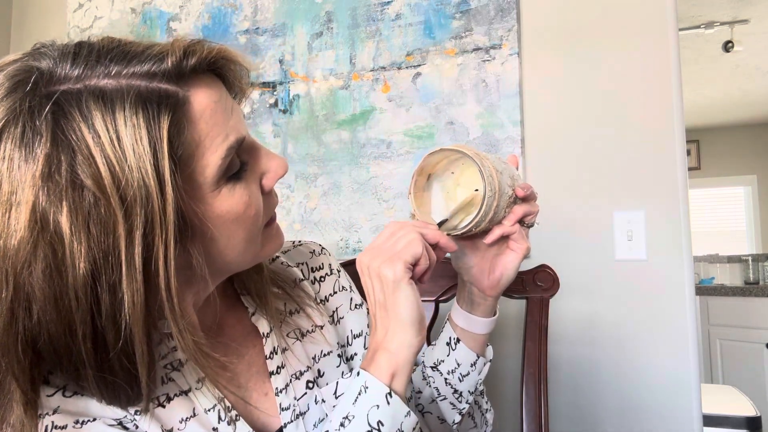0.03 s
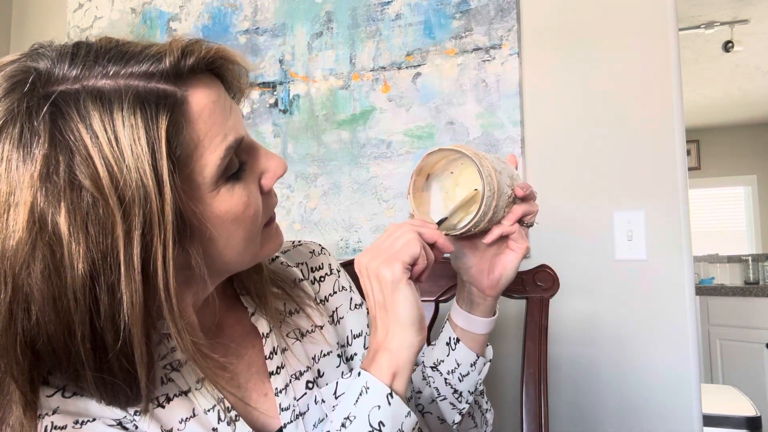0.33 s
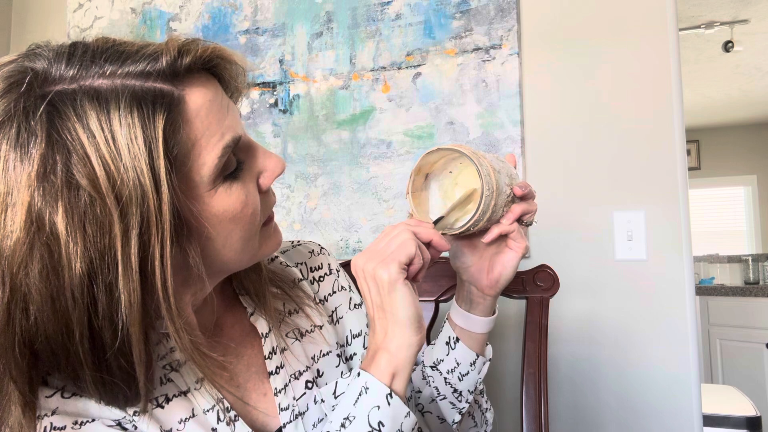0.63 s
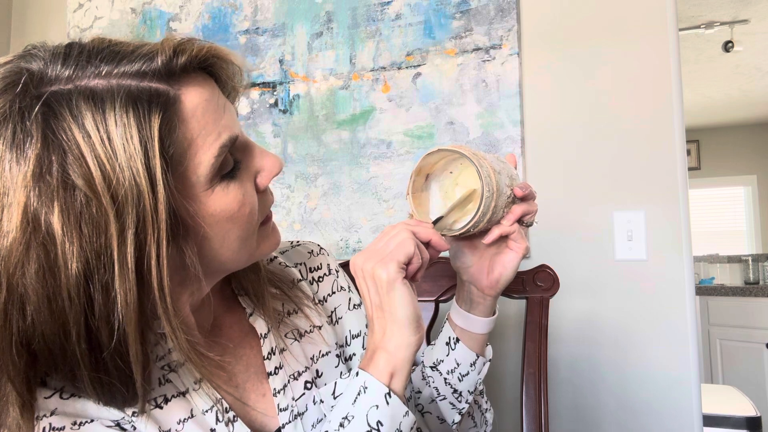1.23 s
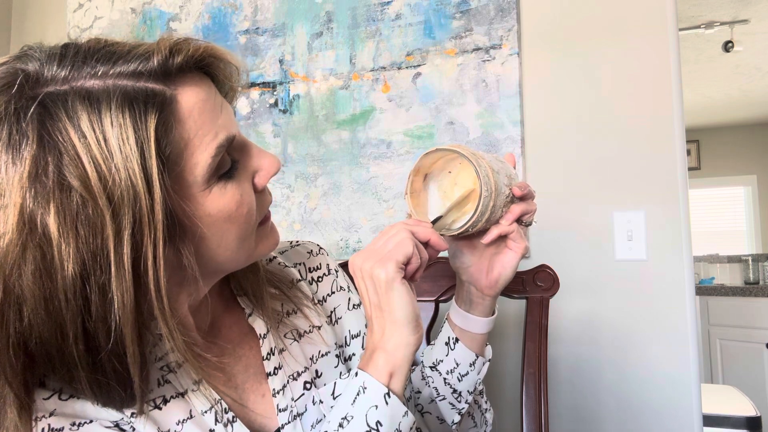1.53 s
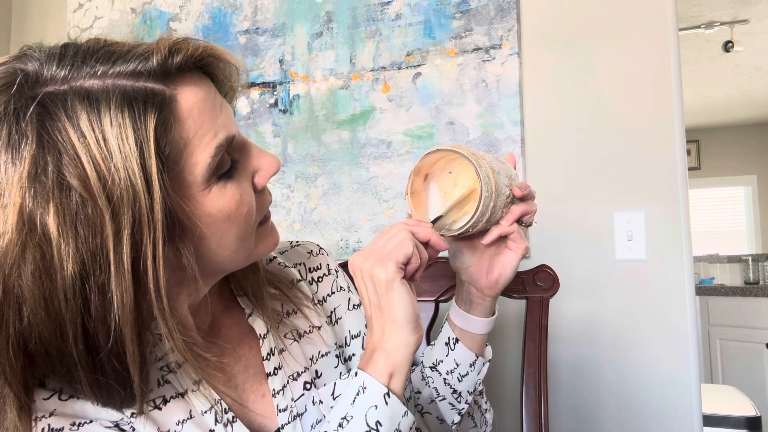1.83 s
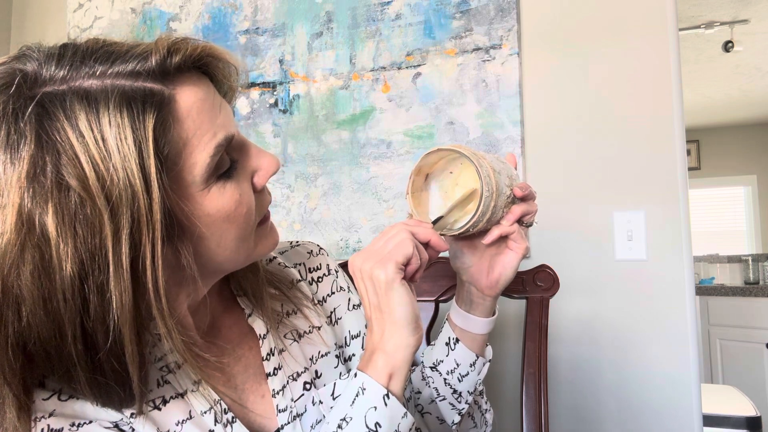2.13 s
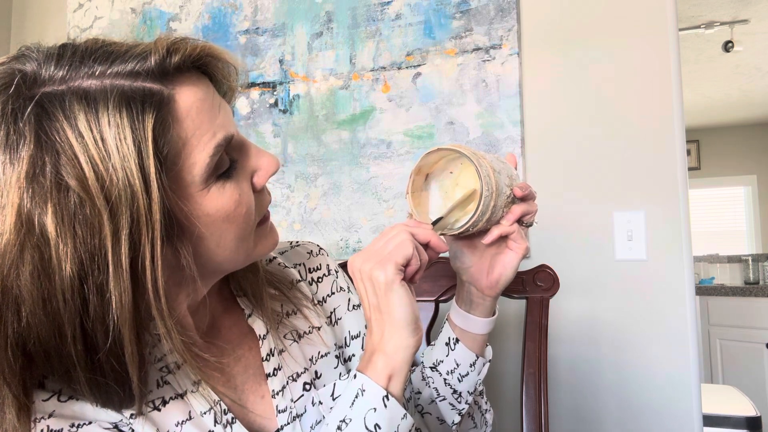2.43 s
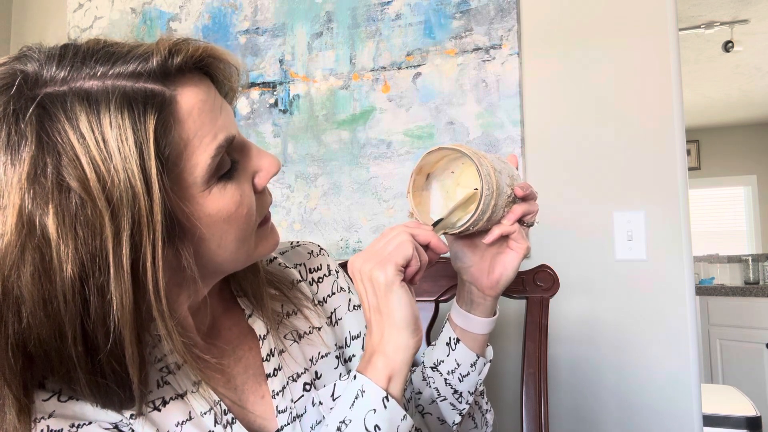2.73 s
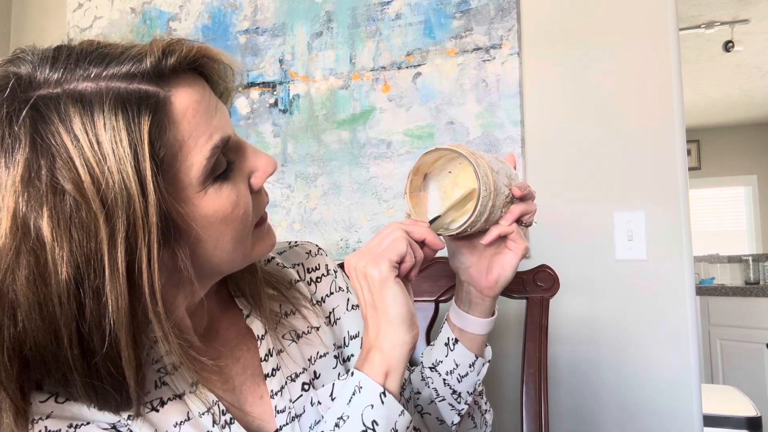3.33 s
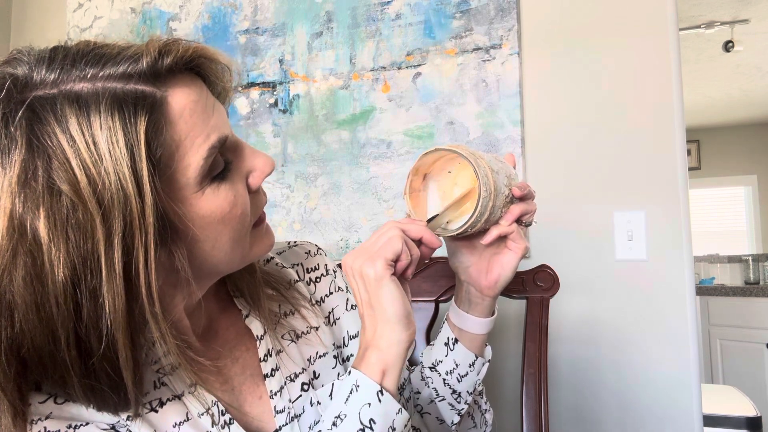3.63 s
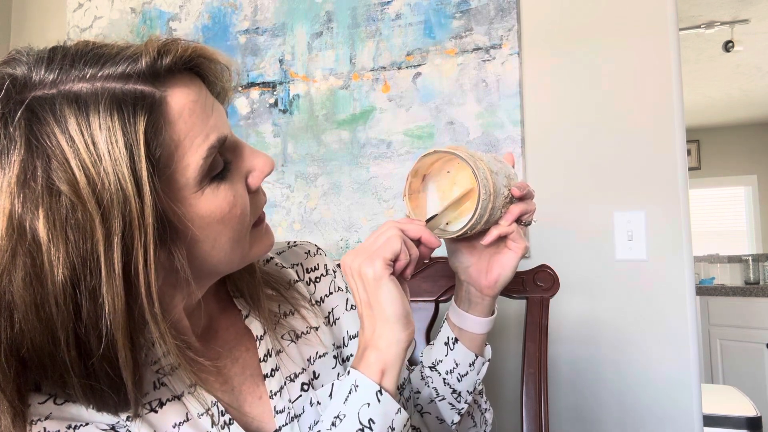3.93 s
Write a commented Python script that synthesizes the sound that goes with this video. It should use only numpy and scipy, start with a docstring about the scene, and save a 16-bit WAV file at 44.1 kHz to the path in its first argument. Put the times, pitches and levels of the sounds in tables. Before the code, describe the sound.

An electric lighter sizzles inside a small candle jar, starting with a quick double click at about 0.2 seconds. The high crackle dips near 0.5, from 1.3 to 1.9, around 3 and after 3.5 seconds. Sharp snaps stand out near 0.7, 1.2, 2.5 and 2.9 seconds. The wick gives tiny pops and flutters faintly around 2.7 seconds. Soft room hum and rumble lie underneath.

```python
"""In a quiet room, an electric arc lighter is held to the wick inside a small candle jar.
Its switch clicks twice, then the arc sizzles in uneven spells: dense tiny sparks and a few louder snaps
ring the hollow of the jar. The waxed wick fries, pops now and then and briefly burns with a flutter.
Mains hum, room noise and a soft rumble lie underneath."""
import sys
import numpy as np
from scipy import signal
from scipy.fft import rfft, irfft
from scipy.io import wavfile

SR = 44100
rng = np.random.default_rng(int(sys.argv[2]) if len(sys.argv) > 2 else 0)


def dump_mix(stems):
    """Bounce the given channels to the path in sys.argv[1] as a 16-bit WAV at rate SR."""
    frames = np.atleast_2d(stems).T  # one column per channel
    limited = np.clip(frames, -1, 1)  # hard clip at full scale
    pcm = np.round(limited * 32767).astype(np.int16)
    wavfile.write(sys.argv[1], SR, pcm)


N = 176400
T = np.arange(N) / SR
F = np.maximum(np.fft.rfftfreq(N, 1 / SR), 1)
SIDE = np.array([[1], [-1]])  # plus on the left, minus on the right

JAR_T60_S, ROOM_T60_S, ROOM_DULL_HZ = 0.062, 0.26, 7460
ROOM_PAN_DB, WICK_PAN_DB = 3.5, 5.5

# The switch's two clicks. Each row: start in seconds, tick level in dB, rise and contact time in
# seconds, top of the treble in Hz, hollow knock in dB, rubbing in dB.
SWITCH_CLICKS = [(0.155, -12.5, 0.00112, 0.0011, 11300, -32, -48),
                 (0.195, -14.5, 0.00016, 0.00022, 16000, -22.5, -71)]


def undb(db):
    """Decibels to gain."""
    return 10 ** (np.asarray(db) / 20)


def unit(x):
    """Scale to rms 1."""
    return x / np.sqrt(np.mean(x ** 2))


def fader(points, trim_db=0, outside_db=None):
    """A gain that rides through (seconds, dB) points."""
    return undb(np.interp(T, *np.array(points).T, left=outside_db, right=outside_db) + trim_db)


def pan_right(x, db):
    """Make the right channel db louder than the left."""
    return x * undb(-SIDE * db / 2)


def drift(hz):
    """Smooth random movement of rms 1, mostly slower than hz."""
    return unit(irfft(rfft(rng.standard_normal(N)) / (1 + (F / hz) ** 2), N))


def causal(gain):
    """Minimum-phase response with the given gain at each frequency."""
    cepstrum = irfft(np.log(gain), N)
    cepstrum[1:N // 2] *= 2
    cepstrum[N // 2 + 1:] = 0
    return np.exp(rfft(cepstrum))


def colour(points):
    """An EQ curve through (Hz, dB) points."""
    hz, db = np.array(points).T
    return causal(undb(np.interp(np.log(F), np.log(hz), db)))


def resonance(hz, width):
    """Response of one damped resonance."""
    return 1 / (1 + 1j * (F ** 2 - hz ** 2) / (F * width))


def through(x, response):
    """Filter by a response scaled to unit power."""
    return irfft(rfft(x) * response / np.sqrt(np.mean(abs(response) ** 2)), N)


def low_pass(x, hz, order):
    """Keep what lies below a frequency."""
    return irfft(rfft(x) / np.sqrt(1 + (F / hz) ** (2 * order)), N)


def band_level(x, low_hz, high_hz):
    """Rms of a sound between two frequencies."""
    return np.sqrt(np.mean(irfft(rfft(x) * (F > low_hz) * (F < high_hz), N) ** 2))


def burst(start, decay_s, rise_s=.0001):
    """A fast-dying crack of noise with unit energy."""
    age = np.maximum(T - start, 0)
    attack = 1 - np.exp(-(age / rise_s) ** 2)
    return unit(rng.standard_normal(N) * attack * np.exp(-age / decay_s)) / np.sqrt(N)


def echoes(x, t60):
    """Dense dying reflections, different left and right."""
    tail = rng.standard_normal((2, N)) * np.exp(-np.log(1000) * T / t60) * np.minimum(T / (t60 / 20), 1)
    return signal.fftconvolve(np.atleast_2d(x), unit(tail) / np.sqrt(N), axes=1)[:, :N]


def space(x, ring_db, room_db):
    """Add the jar's short ring and the room's duller echo."""
    ring = undb(ring_db) * echoes(x, JAR_T60_S)
    return x + ring + undb(room_db) * low_pass(echoes(x, ROOM_T60_S), ROOM_DULL_HZ, order=2)


def room_tone():
    """Soft room noise and slightly wavering hum, a little to the right."""
    # Colour of the room noise. Each row: frequency in Hz, relative level in dB.
    air_eq = [(25, -25.5), (55, -1), (90, 0.5), (140, -4), (220, -1.5), (300, -9.5), (500, -11.5),
              (750, -14.5), (1000, -29.5), (2000, -33), (4000, -27), (8000, -34.5), (15000, -42)]
    # Mains hum and appliance tones. Each row: pitch in Hz, relative level in dB.
    hum_tones = [(59.2, -64.5), (209.9, -70.5), (592.2, -78), (651.4, -77), (710.6, -73), (769.8, -80),
                 (829.0, -86)]
    mid, side = through(rng.standard_normal((2, N)), colour(air_eq))
    side = irfft(rfft(side) * F / (F + 70), N)  # the deep bass stays narrow
    air = undb(-68) * (mid + undb(3.5) * side * SIDE)
    hum = 0
    for hz, db in hum_tones:
        phase = 2 * np.pi * (hz * T + rng.random()) + 0.42 * drift(hz=3.8)
        hum = hum + np.sqrt(2) * undb(db - 2.5) * np.sin(phase)
    return pan_right(air + hum, ROOM_PAN_DB)


def rumble():
    """A low boom that swells and sinks unevenly."""
    # The boom's swells. Each row: time in seconds, relative level in dB.
    swells = [(0.0, -56.5), (0.03, -70), (0.14, -76), (0.19, -66), (0.71, -61.5), (0.79, -67),
              (1.14, -62.5), (1.21, -80), (1.26, -66), (1.43, -79), (1.49, -58.5), (1.56, -73), (1.74, -58),
              (1.77, -80), (1.89, -58.5), (2.54, -70.5), (2.63, -60.5), (2.78, -71), (2.96, -59),
              (3.01, -70), (3.2, -58), (3.22, -67), (3.84, -60.5), (4.0, -68)]
    mid, side = through(rng.standard_normal((2, N)), resonance(hz=210.8, width=112) ** 2)
    return pan_right(fader(swells, trim_db=-1.5) * (mid + .5 * side * SIDE), ROOM_PAN_DB)


def switch():
    """The switch catches, scrapes along, then snaps home and knocks the lighter's body."""
    # Colour of a tick. Each row: frequency in Hz, relative level in dB.
    tick_eq = [(300, -26), (1000, 0.5), (1800, -14), (3000, -4), (4700, -5), (7000, 4.5), (9500, 3.5),
               (12000, 11.5), (15500, 1.5)]
    # Modes of the knocked lighter and jar. Each row: pitch in Hz, width in Hz, relative level in dB.
    knock_modes = [(423, 230, 4), (700, 170, 4), (1000, 87, 14), (1210, 110, -6)]
    # Modes of the jar, rung by the scraping switch. Each row: pitch in Hz, width in Hz, relative level in dB.
    scrape_modes = [(1270, 130, -5.5), (2100, 220, -0.5), (3170, 140, 0), (3610, 140, -6), (5000, 830, 0.5),
                    (6550, 690, 0), (8200, 370, -11)]
    body, scrape = (sum(undb(db) * resonance(hz, width) for hz, width, db in modes)
                    for modes in (knock_modes, scrape_modes))
    rub_decay_s = 0.027
    clicks = 0
    for at, db, rise, contact, top_hz, knock_db, rub_db in SWITCH_CLICKS:
        rub = undb(rub_db) * rng.standard_normal(N) * (T > at) * np.exp(-abs(T - at) / rub_decay_s)
        tick = through(undb(db) * burst(at, contact, rise), colour(tick_eq))
        knock = undb(knock_db) * through(signal.unit_impulse(N, int((at + rise) * SR)), body)
        clicks = clicks + low_pass(tick + through(rub, scrape), top_hz, order=14) + knock
    return space(clicks, ring_db=-10, room_db=-5)


def sparks(per_second=8000, spread_db=2, sputter_db=1, flutter_db=1.5, flutter_hz=76.5):
    """Dense tiny discharges of random size that bunch into sputters and flutter quickly."""
    fired = rng.random(N) < per_second / SR
    size_db = spread_db * np.clip(rng.standard_normal(N), -2, 2)
    flutter = through(rng.standard_normal(N), resonance(flutter_hz, 2 * flutter_hz) ** 2)
    bunch_db = sputter_db * np.clip(drift(hz=734), -2, 2) + flutter_db * np.minimum(flutter, 2)
    return unit(fired * rng.choice([-1, 1], N) * undb(size_db + bunch_db))


def wax_pop(start, end_hz, start_hz=3500, fall_s=.0009, decay_s=.0028):
    """A tiny pop in the wax: a few cycles that fall quickly in pitch."""
    age = np.maximum(T - start, 0)
    cycles = end_hz * age + (start_hz - end_hz) * fall_s * (1 - np.exp(-age / fall_s))
    return unit(np.sin(2 * np.pi * cycles) * np.exp(-age / decay_s)) / np.sqrt(N)


def wick(spark_train, flutter_db=3.5):
    """The sparks fry the waxed wick; it pops now and then and briefly burns with a rough flutter."""
    # Colour of the frying. Each row: frequency in Hz, relative level in dB.
    fry_eq = [(200, -6), (400, 4.5), (700, 3.5), (1000, 5), (1400, 2), (1900, -3), (3200, 3), (5000, -2.5),
              (8000, 4.5), (14000, -42.5)]
    # Spells of frying. Each row: time in seconds, relative midrange level in dB.
    fry_levels = [(0.21, -63), (0.23, -75.5), (0.37, -73.5), (0.43, -68), (0.53, -83), (0.6, -70.5),
                  (0.73, -78), (1.0, -71), (1.26, -72), (1.32, -84), (1.48, -81), (1.52, -72),
                  (1.55, -87.5), (1.8, -81), (1.87, -88), (1.98, -67), (2.05, -78.5), (2.26, -79),
                  (2.55, -70.5), (2.8, -67.5), (2.86, -70.5), (3.12, -76), (3.16, -70), (3.37, -70),
                  (3.41, -65.5), (3.53, -84), (3.61, -73), (3.97, -73.5), (4.0, -66.5)]
    # The wick's brief burn. Each row: time in seconds, relative level in dB.
    burn_levels = [(2.3, -80.5), (2.55, -65), (2.72, -70), (2.77, -60.5), (2.88, -89), (2.93, -89),
                   (3.1, -82)]
    # Pops in the wax. Each row: start in seconds, relative level in dB, final pitch in Hz.
    pops = [(1.926, -41, 450), (1.9755, -33.5, 880), (2.93, -40, 750), (3.199, -39, 650),
            (3.2555, -34, 850)]
    fry = through(spark_train, colour(fry_eq))
    fry = fry * fader(fry_levels, trim_db=-1.5) / band_level(fry, 900, 2000)
    burn = through(sparks(), resonance(hz=1010, width=540) ** 2)
    burn = unit(burn * undb(flutter_db * np.clip(drift(hz=45), -2, 2)))
    burn = burn * fader(burn_levels, outside_db=-np.inf)
    direct = fry + burn + sum(undb(db) * wax_pop(at, hz) for at, db, hz in pops)
    return pan_right(direct + undb(-1) * echoes(direct, ROOM_T60_S / 3), WICK_PAN_DB)


def jar_response():
    """The jar's resonances, reaching left and right out of step."""
    # Modes of the jar's hollow. Each row: pitch in Hz, width in Hz, relative level in dB.
    jar_modes = [(2185, 316, -10.5), (3216, 770, -8), (4400, 520, -7), (4720, 340, -10), (6060, 830, -5),
                 (7220, 1140, -9), (8040, 810, -5), (9345, 980, 2.5), (11420, 830, 3), (11770, 1000, -1),
                 (12860, 970, 2.5), (13400, 600, -4), (15300, 160, -10.5)]
    # How far the left channel leads the right. Each row: frequency in Hz, phase in radians.
    left_lead = [(200, -.5), (1200, -.2), (2000, -2.7), (2500, -3.1), (2950, -1.8), (3600, -1.8),
                 (4050, -2.6), (5400, -2.8), (5800, -.3), (6400, -1.5), (7000, -.3), (7700, -1.2),
                 (8700, 0), (10600, 0), (12000, 1.1), (13700, 2.0), (14400, 2.1)]
    gain = np.sqrt(sum((undb(db) * abs(resonance(hz, width)) ** 2) ** 2 for hz, width, db in jar_modes))
    lead = np.interp(F, *np.array(left_lead).T)
    return causal(gain) * np.exp(.5j * lead * SIDE)


def arc(waver_db=1.2):
    """Sparks and snaps ring the jar as the wick fries; the treble above 13.6 kHz cuts in and out."""
    # Strength of the arc. Each row: time in seconds, relative treble level in dB.
    strength = [(0.21, -59.5), (0.25, -49.5), (0.3, -49), (0.44, -49), (0.52, -77), (0.55, -76),
                (0.57, -62.5), (0.72, -49.5), (0.95, -47.5), (1.09, -50), (1.14, -47.5), (1.285, -48),
                (1.3, -62), (1.44, -60.5), (1.53, -67.5), (1.62, -57), (1.72, -53.5), (1.86, -63),
                (1.93, -50), (2.3, -50.5), (2.48, -45.5), (2.75, -48), (2.77, -43.5), (2.87, -50.5),
                (2.89, -59), (2.91, -53), (2.96, -68), (2.99, -54.5), (3.0, -62.5), (3.11, -65.5),
                (3.14, -53), (3.22, -56.5), (3.26, -48.5), (3.33, -47), (3.41, -52), (3.45, -47.5),
                (3.47, -59), (3.5, -68), (3.56, -57), (3.63, -60.5), (3.9, -59.5), (4.0, -51.5)]
    # The arc's louder snaps. Each row: start in seconds, level in dB.
    snap_hits = [(0.376, -35), (0.68, -27.5), (1.172, -25.5), (1.43, -31), (1.607, -37), (1.925, -31),
                 (2.459, -25), (2.502, -25), (2.62, -34), (2.865, -26), (2.906, -29), (3.129, -39),
                 (3.262, -30)]
    # Level of the highest treble. Each row: time in seconds, boost or cut in dB.
    top_band_gains = [(0.22, 2), (0.29, 22), (0.44, 13), (0.52, -12), (0.8, -27), (0.93, 21), (1.03, 1),
                      (1.17, 18), (1.42, 10), (1.49, -33), (1.9, -41), (2.35, -30), (2.58, 18.5), (2.9, 11),
                      (2.96, -35), (3.32, -38), (3.6, -41)]
    strike_s = SWITCH_CLICKS[-1][0]  # the arc lights on the second click
    lit = np.clip((T - strike_s) / 0.0045, 0, 1) * np.clip((T[-1] - T) / 0.0033, 0, 1)
    train, jar = sparks(), jar_response()
    sizzle = train * lit * fader(strength, trim_db=2.52) / band_level(through(train, jar), 8000, 13000)
    snaps = sum(undb(db) * burst(at, decay_s=0.00057) for at, db in snap_hits)
    crackle = through(sizzle + snaps, jar)
    hollow = low_pass(crackle, hz=5500, order=12)
    body = low_pass(crackle, hz=13600, order=40)
    top_band = (crackle - body) * fader(top_band_gains)
    crackle = hollow * undb(waver_db * drift(hz=35)) + (body - hollow) + top_band
    return space(crackle, ring_db=-15.5, room_db=-35.5) + wick(train * lit)


def scene():
    """The arc and its switch over room tone and rumble."""
    return arc() + switch() + room_tone() + rumble()


def record(dry, top_hz=15850):
    """A steep low-pass cuts the very top."""
    return signal.sosfilt(signal.ellip(10, .2, 70, top_hz, fs=SR, output="sos"), dry)


dry = scene()
out = record(dry)
dump_mix(out)
```